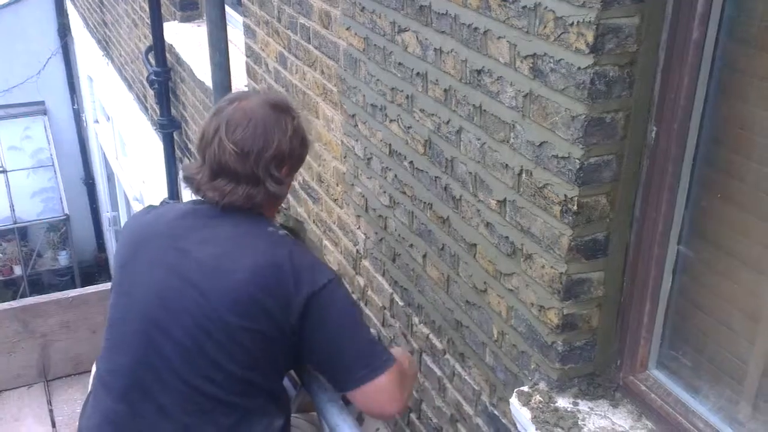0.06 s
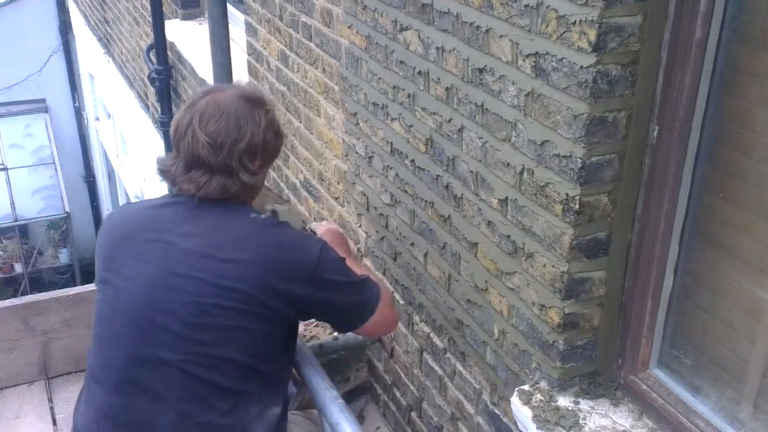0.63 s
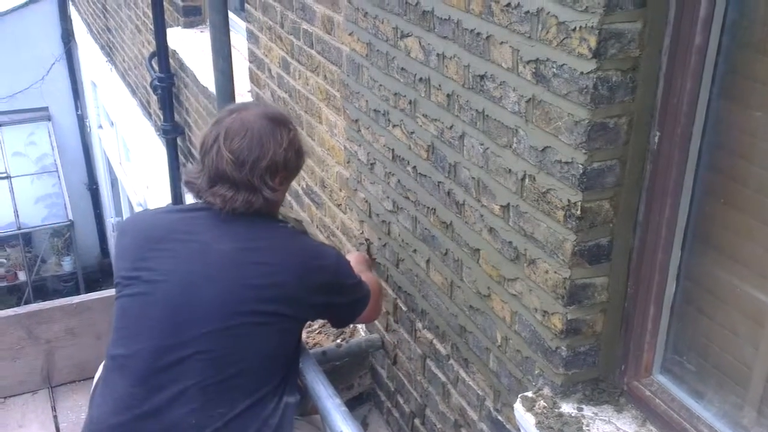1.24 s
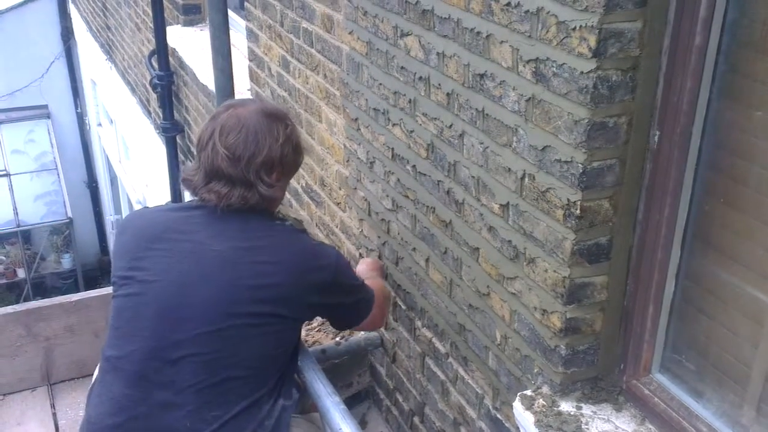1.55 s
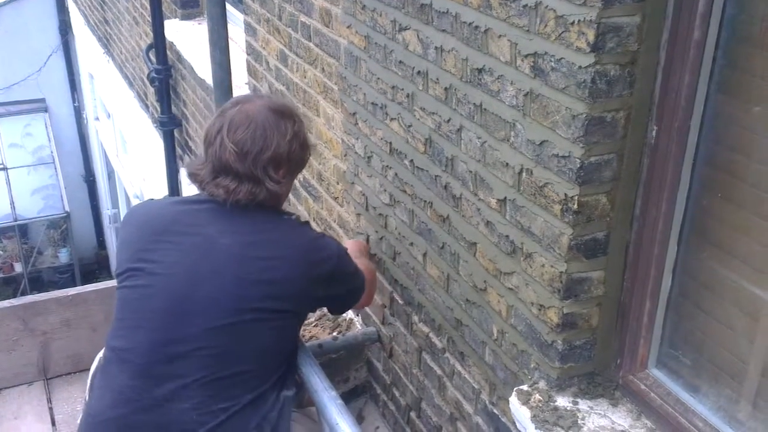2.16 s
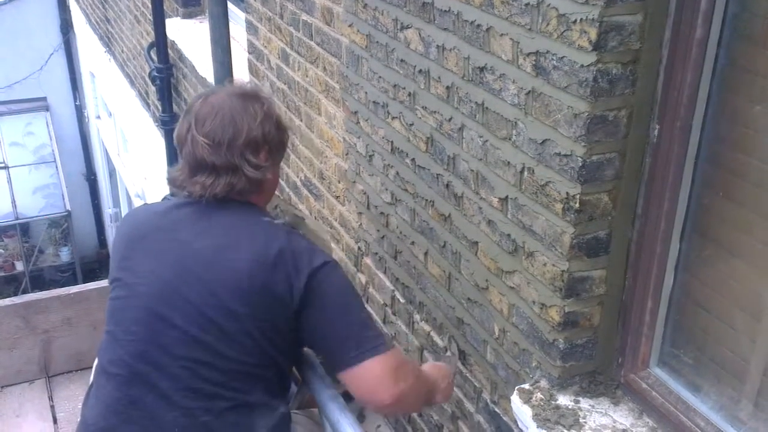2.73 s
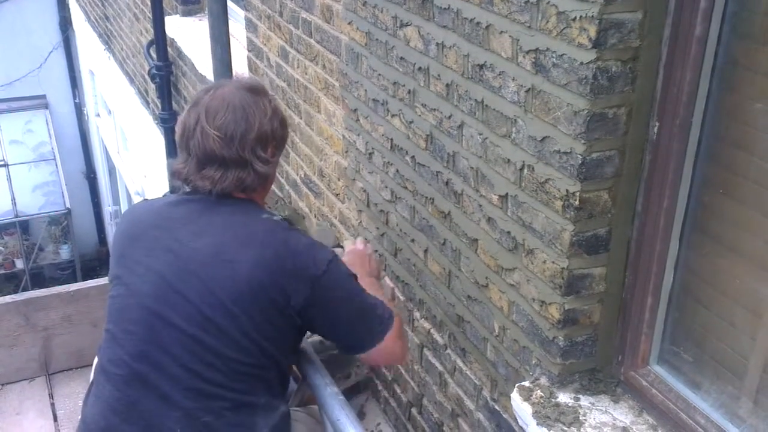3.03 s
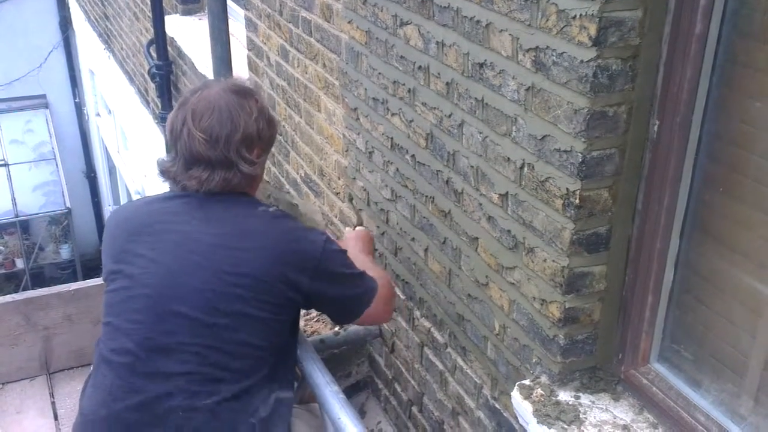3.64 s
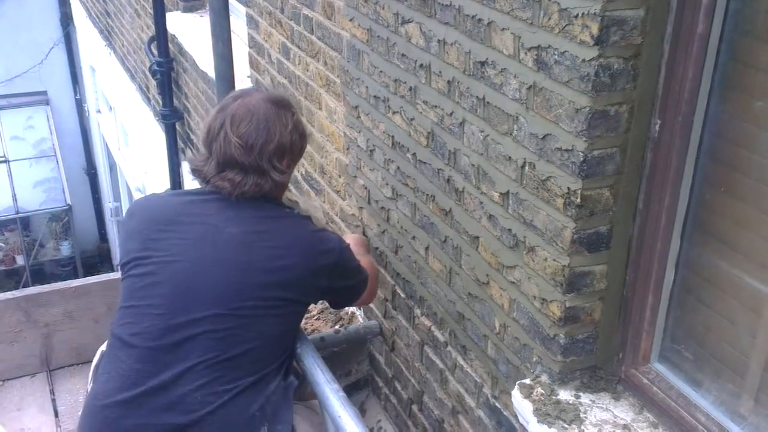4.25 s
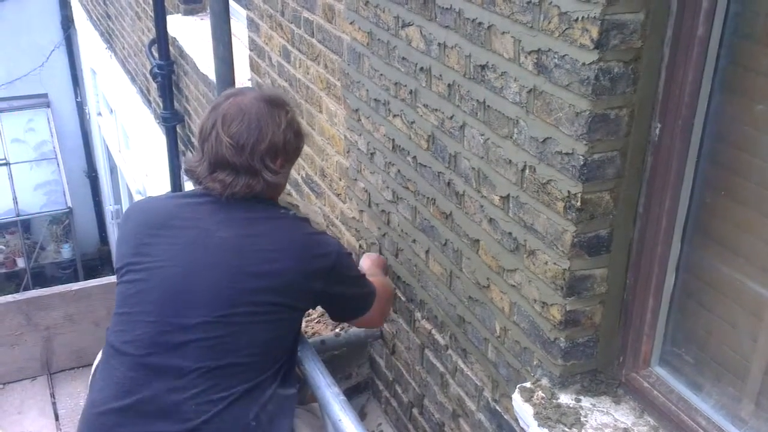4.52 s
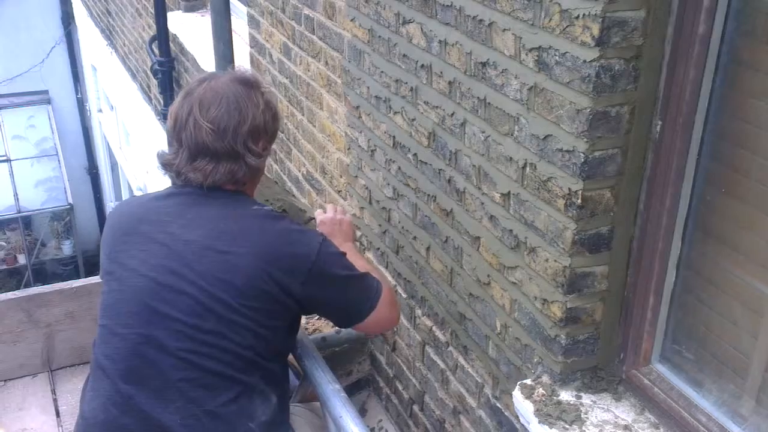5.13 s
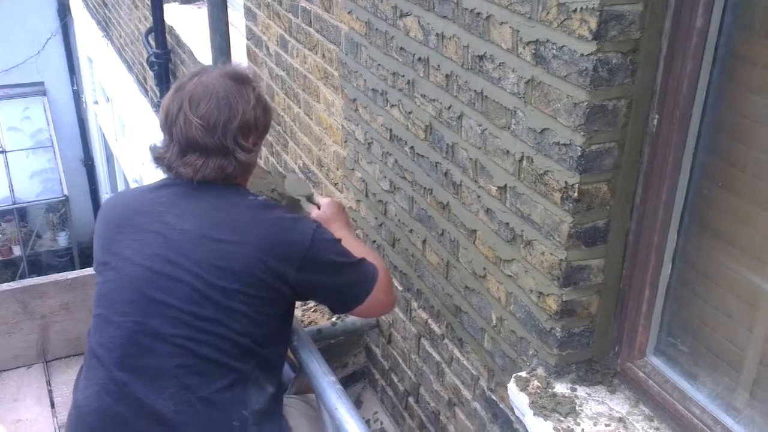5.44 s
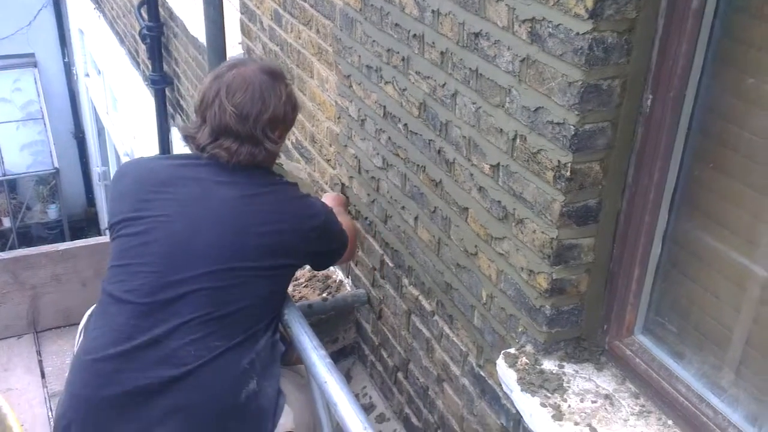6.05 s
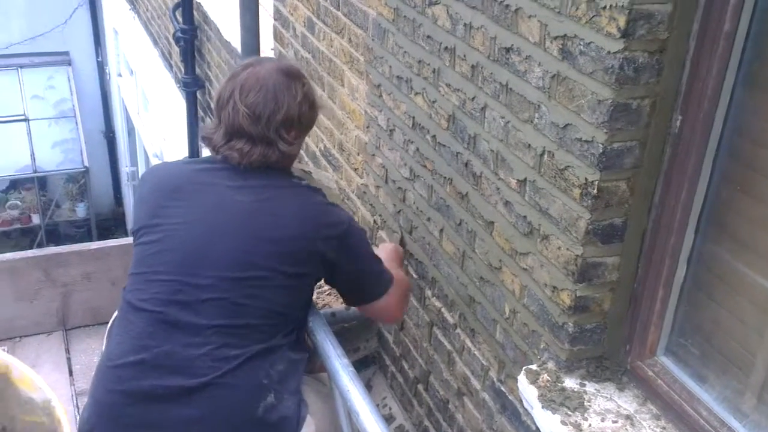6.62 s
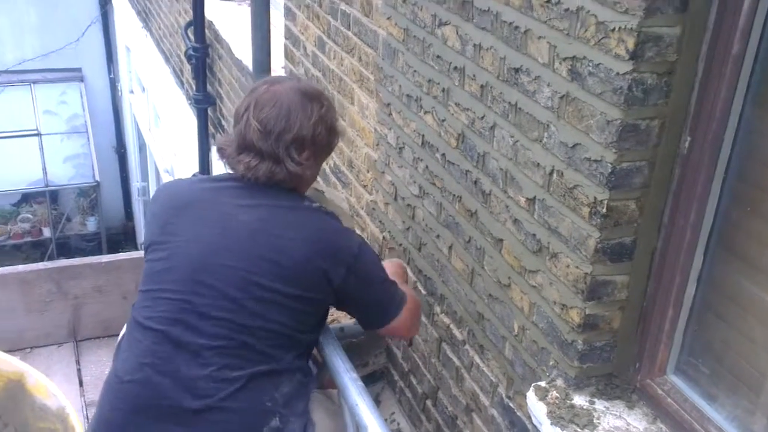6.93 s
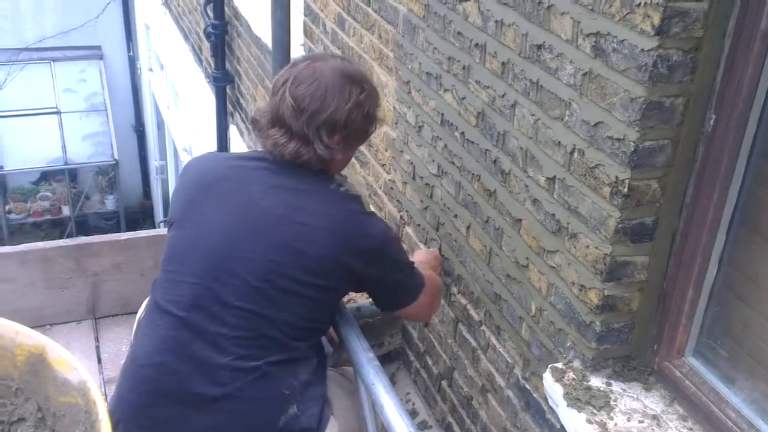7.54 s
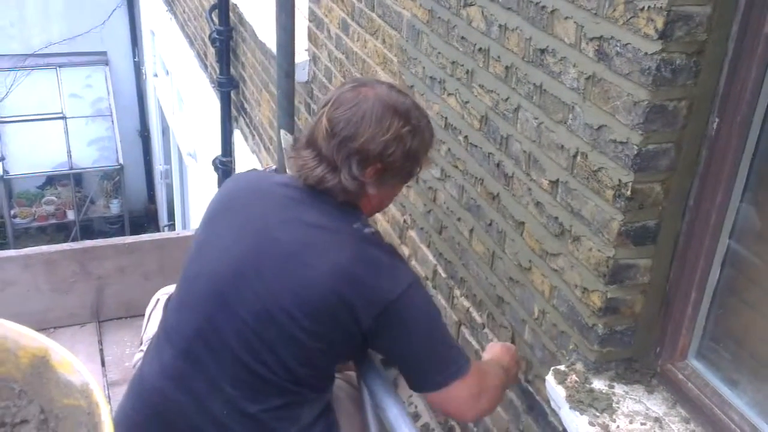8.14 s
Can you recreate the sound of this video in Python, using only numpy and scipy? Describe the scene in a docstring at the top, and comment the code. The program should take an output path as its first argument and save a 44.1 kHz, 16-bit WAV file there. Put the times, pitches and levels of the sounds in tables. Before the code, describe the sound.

Outdoors beside a brick wall, a small steel trowel smears and pats wet mortar a couple of metres from the microphone. A soft opening stroke leads to a cluster of gritty scrapes and sharp ticks, then lighter rubbing, another crisp scrape, and a longer run of scratchy strokes toward the end. The blade rings briefly when it catches on brick. The distant town wash stays barely audible.

```python
"""Trowel on a brick wall

A steel pointing trowel works mortar along the joints, outdoors, a couple of metres away.
The mortar smears with a dull, sandy rasp; where the bare edge meets brick it hisses, catches on
grit and the blade rings. Soft pats press the mortar home. The wall throws the strokes back
over a quiet town background."""
import sys
import numpy as np
from scipy import signal
from scipy.fft import rfft, irfft
from scipy.io import wavfile
from scipy.ndimage import uniform_filter1d

SR = 44100
rng = np.random.default_rng(int(sys.argv[2]) if len(sys.argv) > 2 else 0)


def to_wav(s):
    """Save 16-bit WAV."""
    ch = np.atleast_2d(s).T  # columns
    pcm = np.round(np.clip(ch, -1, 1) * 32767)  # PCM
    wavfile.write(sys.argv[1], SR, pcm.astype(np.int16))


N = 365148
T = np.arange(N) / SR
HZ = np.fft.rfftfreq(N, 1 / SR)


def amp(db):
    """Turns decibels into a number to multiply by."""
    return 10 ** (np.asarray(db) / 20)


def unit(x):
    """Scales a signal to an average power of 1."""
    return x / np.sqrt(np.mean(x ** 2) + 1e-20)


def shape(points):
    """Joins (f/Hz, level/dB) points into a tone curve: one gain for each frequency."""
    f, db = np.transpose(points)
    return amp(np.interp(np.log(HZ + 1), np.log(f + 1), db))


def colour(x, gain):
    """Filters a sound by a tone curve of average power 1, keeping its attacks sharp."""
    cepstrum = irfft(np.log(np.maximum(unit(gain), 1e-5)), N)
    cepstrum[1:N // 2] *= 2  # this fold puts all ringing after a hit, none before
    cepstrum[N // 2 + 1:] = 0
    ringing = irfft(np.exp(rfft(cepstrum)), N)[:4096]
    return signal.oaconvolve(x, ringing)[:N]


def wobble(rate_hz):
    """A random drift of about 1 either way, mostly slower than rate_hz."""
    return unit(irfft(rfft(rng.standard_normal(N)) / (1 + (HZ / rate_hz) ** 2), N))


def bell(middle_s, length_s):
    """A brief push that comes and goes smoothly."""
    return np.exp(-np.minimum((2 * (T - middle_s) / length_s) ** 2, 50))


def add(mix, start_s, sound):
    """Lays a sound into the mix at a given time."""
    part = mix[max(round(start_s * SR), 0):][:len(sound)]
    part += sound[:len(part)]


# How unlike the reflections are at the two microphones: f/Hz, side gain/dB
STEREO_WIDTH = [(60, -1), (150, -20), (400, -8), (700, -8), (1300, 3), (2400, -3), (4500, -3.5),
                (9000, -1.5), (15000, 1)]
def spread(mid, side):
    """Makes left and right from what they share (mid) and what sets them apart (side)."""
    side = irfft(rfft(side) * shape(STEREO_WIDTH), N)
    return np.array([mid + side, mid - side])


# Tone of the town: f/Hz, relative level/dB
TOWN_TONE = [(20, -52), (80, -52), (125, -26.5), (180, -13), (260, -0.5), (440, -4), (600, 9), (780, 2),
             (1020, 1.5), (1800, -8), (3300, -3.5), (5000, -14.5), (9000, -26.5), (15000, -34)]
def town(level_db=-70.5, swell_db=1):
    """A distant wash of noise from all around, gently swelling."""
    mid, side = (unit(colour(rng.standard_normal(N), shape(TOWN_TONE))) for _ in range(2))
    return amp(level_db + swell_db * wobble(rate_hz=1)) * spread(mid, side)


def echoes(early_db, early_s, tail_db, tail_s):
    """A quick cloud of echoes from wall and boards, then a faint tail from the houses around."""
    t = np.arange(SR // 2) / SR
    taps = rng.choice([-1, 1], len(t)) * (rng.random(len(t)) < 5000 / SR) * (t > 0.0007)
    early = taps * np.exp(-t / early_s)
    tail = np.roll(taps * amp(-60 * t / tail_s), 300)
    return amp(early_db) * early / np.linalg.norm(early) + amp(tail_db) * tail / np.linalg.norm(tail)


def yard(direct, patterns=8, changes_per_s=14):
    """Adds echoes to the direct sound; their pattern keeps changing as arm and blade move."""
    mid, side = np.zeros((2, N))
    for k in range(patterns):
        away = abs((T * changes_per_s - k + patterns / 2) % patterns - patterns / 2)
        part = direct.mean(0) * np.cos(np.pi / 2 * np.minimum(away, 1))  # each fades into the next
        mid_echoes = echoes(early_db=-8.5, early_s=0.0077, tail_db=-21, tail_s=0.21)
        side_echoes = echoes(early_db=0.5, early_s=0.0045, tail_db=-22, tail_s=0.51)
        mid += signal.oaconvolve(part, mid_echoes)[:N]
        side += signal.oaconvolve(part, side_echoes)[:N]
    return direct + spread(mid, side)


# Faint, thin whistles: start t/s, length/s, first f/Hz, last f/Hz, relative level/dB
WHISTLE_GLIDES = [(3.64, 0.41, 2140, 2080, -81.5), (3.964, 0.27, 2850, 2500, -71),
                  (4.211, 0.21, 2450, 2330, -66.5), (4.59, .14, 2730, 2990, -61),
                  (4.78, 0.24, 2140, 1970, -65.5)]
def whistles(level_db=-1):
    """Blurred, unsteady tones that swell, slide in pitch and fade."""
    glides = np.zeros(N, complex)
    for start, length, first_hz, last_hz, db in WHISTLE_GLIDES:
        progress = np.arange(0, length, 1 / SR) / length
        turns = np.cumsum(first_hz + (last_hz - first_hz) * progress) / SR
        add(glides, start, amp(db) * np.sin(np.pi * progress) * np.exp(2j * np.pi * turns))
    blur = wobble(rate_hz=55) + 1j * wobble(rate_hz=55)
    return amp(level_db) * (glides * blur).real


# Low notes of the bending blade: f/Hz, relative level/dB
FLEX_NOTES = [(567, 0), (621, -3)]
def flex(bend, level_db=-7, flutter=0.35, drift_hz=9):
    """Rubbing keeps two close, low notes humming and beating against each other."""
    hum = 0
    for hz, db in FLEX_NOTES:
        turns = np.cumsum(hz + drift_hz * wobble(rate_hz=25)) / SR
        hum += amp(db) * (1 + flutter * wobble(rate_hz=72)) * np.sin(2 * np.pi * turns)
    return amp(level_db) * bend * unit(hum)


def grit(per_s, spread_db):
    """Sand grains break under the blade: random clicks, mostly small, a few large."""
    size = amp(spread_db * np.minimum(rng.exponential(1, N), 4))
    return unit(size * rng.choice([-1, 1], N) * (rng.random(N) < per_s / SR))


# Pats of the flat blade on mortar: t/s, relative level/dB, fade time/s
MORTAR_PATS = [(0.107, -50, 0.019), (0.696, -41.5, 0.019), (0.778, -54, 0.11), (1.191, -52.5, 0.079),
               (2.810, -69, 0.061), (5.519, -46.5, 0.027), (6.132, -52.5, 0.02), (8.253, -40, 0.025)]
# Tone of a pat: f/Hz, relative level/dB
PAT_TONE = [(60, -76), (150, -31), (280, -8), (430, -7), (630, 5.5), (800, 2), (1050, 1.5), (1900, -11.5),
            (2600, -7), (5000, -23), (15000, -37)]
def pats(rise_s=0.01):
    """Wet mortar is squashed flat: a dull puff with no ring."""
    t, push = np.arange(SR // 2) / SR, np.zeros(N)
    for start, db, fade_s in MORTAR_PATS:
        add(push, start, amp(db) * (1 - np.exp(-t / rise_s)) * np.exp(-t / fade_s))
    return colour(push * grit(per_s=8000, spread_db=3), shape(PAT_TONE))


# Notes the steel rings at, damped by hand and mortar: f/Hz, width/Hz, relative level/dB
BLADE_NOTES = [(2470, 90, -1), (2680, 130, -3), (3480, 120, -7), (3790, 70, -5), (3995, 90, -2),
               (4220, 90, -3), (5400, 200, -6), (5870, 90, -5), (6490, 70, -6), (6860, 70, -6),
               (7600, 140, -5), (8500, 70, -5), (9380, 80, -6)]
def blade_ring():
    """How much power the blade gives back at each frequency."""
    return sum(amp(db) ** 2 / (1 + (2 * (HZ - hz) / width) ** 2) for hz, width, db in BLADE_NOTES)


def deep_ring(force, sharpness):
    """The blade's lower ringing notes, about 2 to 7 kHz, which a deep bite shakes."""
    band = 1 / (1 + (HZ / 7500) ** 8) / (1 + (2200 / (HZ + 1)) ** 6)
    return colour(force, band * blade_ring() ** sharpness)


# Tone of the steel edge on brick: f/Hz, relative level/dB
EDGE_TONE = [(40, -30), (120, -35), (300, -13.5), (1000, -20), (1900, -23.5), (2600, -14.5), (4000, 1),
             (4800, 1.5), (7000, 4), (10000, 1.5), (13000, -8), (16000, -29.5)]
def steel(force):
    """The blade gives off a bright rubbing noise with its own notes standing out."""
    return colour(force, shape(EDGE_TONE) * np.sqrt(1 + 2 * blade_ring()))


def wander(x, patchy_db, patch_s=0.024, patch_hz=500):
    """The touching point slides along the blade, so each moment favours other frequencies."""
    hz, t, spectrum = signal.stft(x, SR, nperseg=256, noverlap=192)
    patches = rng.standard_normal(spectrum.shape)
    for _ in range(2):  # smooth over time and frequency
        patches = uniform_filter1d(patches, round(patch_s / t[1]), axis=1)
        patches = uniform_filter1d(patches, round(patch_hz / hz[1]), axis=0)
    depth = np.minimum(hz / 2000, 1)[:, None]  # the bass stays steadier
    gain = amp(patchy_db * depth * unit(patches))
    return signal.istft(spectrum * gain, SR, nperseg=256, noverlap=192)[1][:N]


# Moments when the blade chatters: middle t/s, length/s, level/dB
CHATTER_BURSTS = [(1.63, 0.019, -52.5), (1.772, 0.05, -58), (2.094, 0.031, -49.5), (2.31, 0.19, -53),
                  (2.747, 0.023, -49), (4.72, 0.037, -41.5)]
def chatter():
    """The edge sticks and slips, making the blade sing for a moment."""
    push = sum(amp(db) * bell(middle, length) for middle, length, db in CHATTER_BURSTS)
    return deep_ring(push * grit(per_s=1500, spread_db=1.5), sharpness=0.65)


# The edge catches on grit: t/s, relative level/dB, relative depth of the bite/dB, number of snaps
GRIT_CATCHES = [(0.6257, -32, -25, 1), (1.636, -52, -15, 1), (1.6582, -28, -34, 1), (1.75, -32.5, -14.5, 2),
                (2.1944, -27, -13, 1), (2.2259, -27.5, -11, 1), (2.3794, -23, -6.5, 1),
                (2.4391, -22, -23, 2), (2.487, -38.5, 4, 1), (2.6231, -18.5, -29, 3),
                (4.424, -31.5, -40, 1), (4.565, -24.5, -15, 1), (4.7134, -28.5, 3.5, 3),
                (5.234, -57, -14, 1), (6.4973, -19, -32, 2), (6.524, -18.5, -35, 1), (6.5993, -29, -29, 1),
                (7.3602, -35, -14, 1), (7.458, -28, -34, 1), (7.4928, -28, -20, 1), (7.5225, -24, -24, 1),
                (7.574, -29.5, -19, 1), (7.6148, -27, -44, 1), (7.8435, -31.5, -16, 1),
                (7.996, -35, 0.5, 1), (8.0476, -26.5, -15, 1), (8.267, -23.5, -24, 1)]
def catches(level_db=-10, snap_db=7, deep_db=6, left_db=1.5, build_s=0.0007, crumble_s=0.0046):
    """The edge strains against grit, snaps free, and the grit crumbles; deep bites ring lower."""
    skip_s = 0.0098  # from one snap to the next
    t = np.arange(-SR // 200, SR // 20) / SR
    burst = np.exp(np.where(t < 0, t / build_s, -t / crumble_s))
    snap = amp(snap_db) * (t == 0)
    bright, deep = np.zeros((2, N))
    for first, db, depth_db, snaps in GRIT_CATCHES:
        for start in first + skip_s * np.arange(round(snaps)):
            force = amp(db + level_db) * (burst * rng.standard_normal(len(t)) + snap)
            add(bright, start + build_s + t[0], force)
            add(deep, start + build_s + t[0], force * amp(depth_db + deep_db))
    bright = np.convolve(bright, [1, -0.2])[:N]  # a snap is crisper than steady rubbing
    toward_left = amp([[left_db / 2], [-left_db / 2]])
    return toward_left * wander(steel(bright), patchy_db=1) + deep_ring(deep, sharpness=0.53)


def grinding(level_db=-25, build_s=0.011, fade_s=0.025):
    """How hard grit grinds under the edge: it builds before each catch, then dies away."""
    t = np.arange(-SR // 8, SR // 8) / SR
    swell = np.exp(np.where(t < 0, t / build_s, -t / fade_s))
    grind = np.zeros(N)
    for time, db, *_ in GRIT_CATCHES:
        add(grind, time + t[0], amp(db + level_db) * swell)
    return grind


def scrape(bite, level_db=-2, judder_db=1.5, crackle_db=-7):
    """The bare edge judders over grains of brick; now and then a coarse one cracks."""
    grains = grit(per_s=4000, spread_db=3.2) + amp(crackle_db) * grit(per_s=70, spread_db=2.5)
    force = grains * bite * amp(judder_db * wobble(rate_hz=54))
    return amp(level_db) * wander(steel(force), patchy_db=2.5)


# Tone of smeared mortar: f/Hz, relative level/dB
MORTAR_TONE = [(60, -57), (150, -22.5), (250, -5.5), (450, 0.5), (1000, 2), (1500, -3), (1800, -4),
               (2600, 3), (3600, 3.5), (4900, -6.5), (7200, -6), (10000, -20.5), (12500, -26),
               (16000, -51.5)]
def smear(drag, level_db=-1, lumpy_db=0.65):
    """Dense, fine sand rasps as it is dragged along the joint."""
    force = grit(per_s=14000, spread_db=1) * drag * amp(lumpy_db * wobble(rate_hz=54))
    return amp(level_db) * wander(colour(force, shape(MORTAR_TONE)), patchy_db=2)


# Jabs of the tip: middle t/s, drag on mortar/dB, bite on brick/dB
TIP_JABS = [(0.639, -46.5, -49), (1.069, -62.5, -80), (1.568, -61.5, -62), (1.651, -69, -47),
            (1.88, -67.5, -92), (2.752, -52.5, -55), (3.436, -52, -64), (4.045, -57, -66),
            (4.718, -53.5, -38.5), (5.408, -58, -49.5), (6.761, -56.5, -60), (7.87, -44, -53),
            (8.222, -55.5, -47.5)]
def jabs(length_s=0.04):
    """How hard the tip drags and bites as it pokes into the joint."""
    drag = sum(amp(db) * bell(middle, length_s) for middle, db, _ in TIP_JABS)
    bite = sum(amp(db) * bell(middle, length_s) for middle, _, db in TIP_JABS)
    return drag, bite


# Strokes along the joint: start t/s, length/s, rise/s, change in push from start to end/dB,
# drag on mortar/dB, bite on brick/dB, bend of the blade/dB
TROWEL_STROKES = [(0.35, 0.25, .2, -13.5, -49, -63.5, -77), (0.764, 0.16, 0.023, -17, -69.5, -82, -72),
                  (1.18, 0.13, .02, -12, -66.5, -81, -77), (1.489, 0.3, 0.01, 7.5, -63, -63.5, -67.5),
                  (2.073, 0.059, 0.011, -1.5, -55, -55.5, -76), (2.173, 0.13, 0.024, 6, -57.5, -52.5, -71),
                  (2.31, 0.44, 0.035, -1.5, -52.5, -51.5, -63.5), (2.795, .13, 0.021, -21, -56.5, -66, -65),
                  (3.376, 0.06, .008, 5, -65.5, -59, -68), (3.819, 0.28, .02, 2, -64, -77, -60),
                  (4.084, 0.26, 0.024, -11, -77, -83, -82), (4.283, 0.49, .12, 5.5, -62.5, -65, -62.5),
                  (4.726, 0.24, 0.039, -6.5, -58, -76, -57), (5.357, 0.23, 0.087, -21, -52.5, -62.5, -68.5),
                  (6.1, 0.2, 0.097, -12.5, -49.5, -65, -79), (6.285, .11, 0.028, 0, -51, -59.5, -70),
                  (6.396, 0.13, 0.011, -0.5, -53, -51, -61), (6.533, 0.41, 0.016, -11.5, -60, -75, -63),
                  (7.214, 0.14, 0.025, -13, -56, -65, -62), (7.333, 0.3, 0.033, 9, -60.5, -56.5, -64),
                  (7.628, 0.19, 0.055, -3, -54, -52.5, -63), (7.822, 0.45, 0.017, 2.5, -53, -53, -58)]
def strokes(levels_db, release_s):
    """The push of each stroke rises, leans in or eases off steadily, and lifts away."""
    push = np.zeros(N)
    for (start, length, rise, swell_db, *_), db in zip(TROWEL_STROKES, levels_db):
        t = np.arange(0, length + 10 * release_s, 1 / SR)
        attack = np.sin(np.pi / 2 * np.minimum(t / rise, 1)) ** 2
        lean = amp(db + swell_db * (np.minimum(t / length, 1) - 0.5))
        lift = np.exp(-np.maximum(t - length, 0) / release_s)
        add(push, start, attack * lean * lift)
    return push


def hand(rest_drag_db=-77.5, rest_bite_db=-83.5, rest_bend_db=-80, rub_fade_s=0.012, hum_fade_s=0.065):
    """How hard the blade drags, bites and bends; a faint rustle and hum stay between strokes."""
    *_, drag_db, bite_db, bend_db = np.transpose(TROWEL_STROKES)
    jab_drag, jab_bite = jabs()
    drag_power = strokes(drag_db, rub_fade_s) ** 2 + jab_drag ** 2 + amp(rest_drag_db) ** 2
    bite_power = strokes(bite_db, rub_fade_s) ** 2 + jab_bite ** 2 + amp(rest_bite_db) ** 2
    bend_power = strokes(bend_db, hum_fade_s) ** 2 + amp(rest_bend_db) ** 2
    return np.sqrt([drag_power, bite_power + grinding() ** 2, bend_power])


def scene():
    """The trowel and its echoes, over the quiet town."""
    drag, bite, bend = hand()
    trowel = smear(drag) + scrape(bite) + chatter() + flex(bend) + pats() + catches()
    return yard(trowel + whistles()) + town()


# How the two microphones differ in tone: f/Hz, left minus right level/dB
MIC_BALANCE = [(400, -0.5), (1200, 1.5), (2400, 0), (4400, -1.5), (8000, -0.5), (14000, 8.5)]
def record(dry, whine_hz=12269, whine_db=-86, cutoff_hz=15300):
    """Two slightly unequal microphones, a thin electronic whine, and the highest treble cut off."""
    tilt = np.sqrt(shape(MIC_BALANCE))
    heard = irfft(rfft(dry) * np.array([tilt, 1 / tilt]), N)
    whine = amp(whine_db) * np.sqrt(2) * np.sin(2 * np.pi * whine_hz * T)
    treble_cut = signal.firwin(301, cutoff_hz, window=("kaiser", 7), fs=SR)
    return signal.oaconvolve(heard + whine, treble_cut[None], "same")


dry = scene()
out = record(dry)
to_wav(out)
```